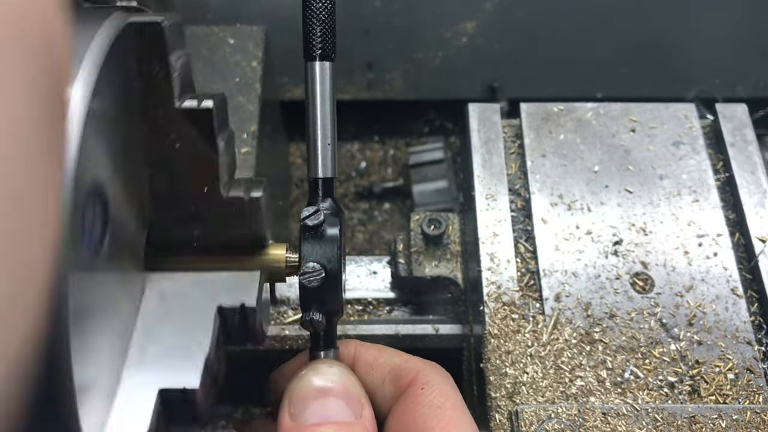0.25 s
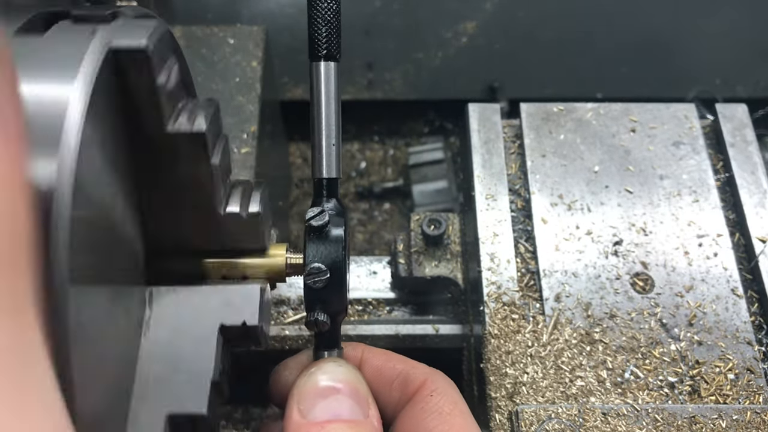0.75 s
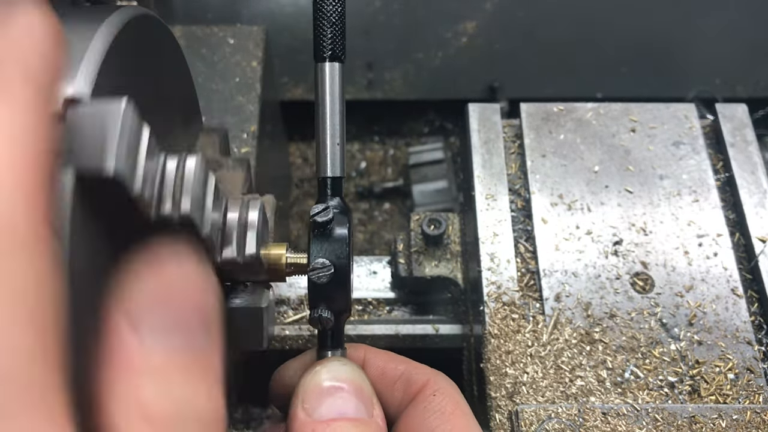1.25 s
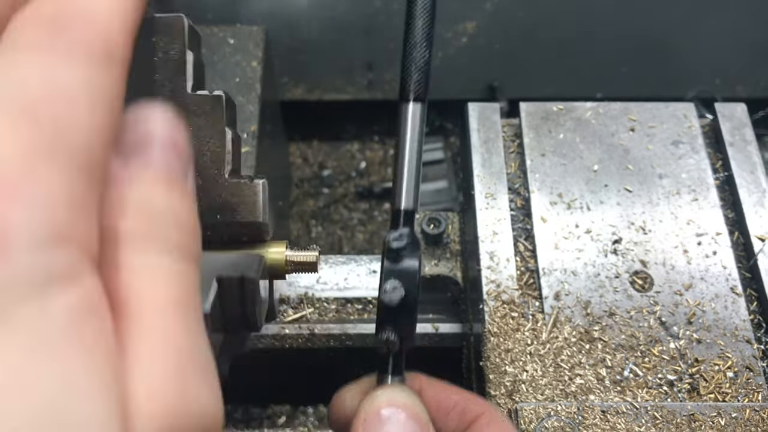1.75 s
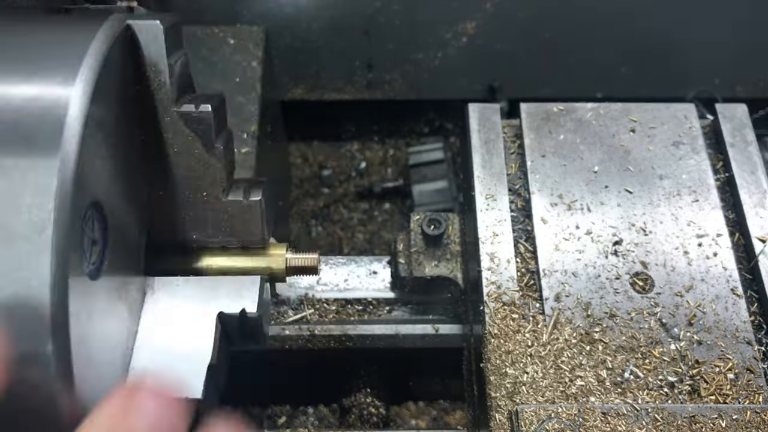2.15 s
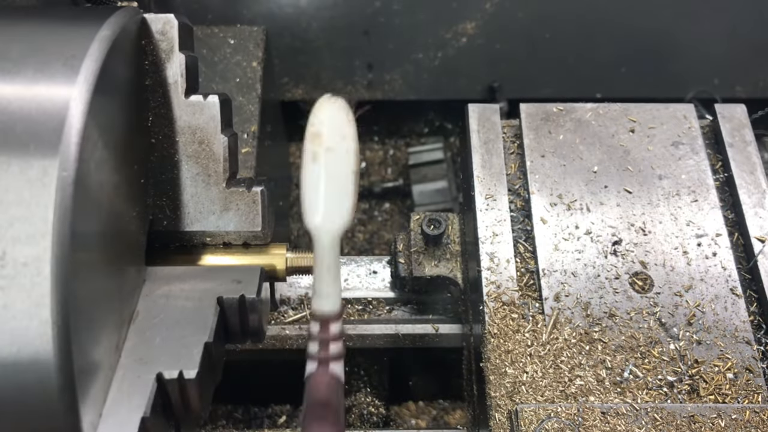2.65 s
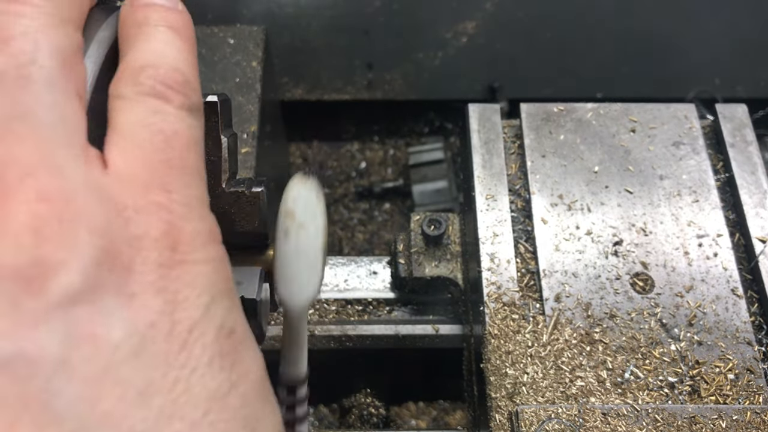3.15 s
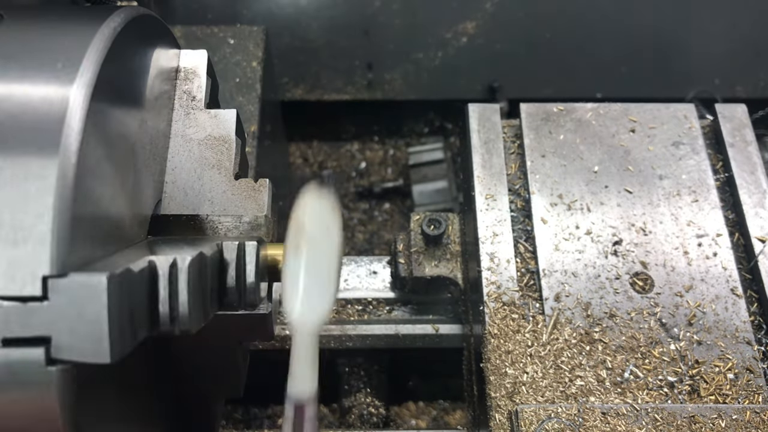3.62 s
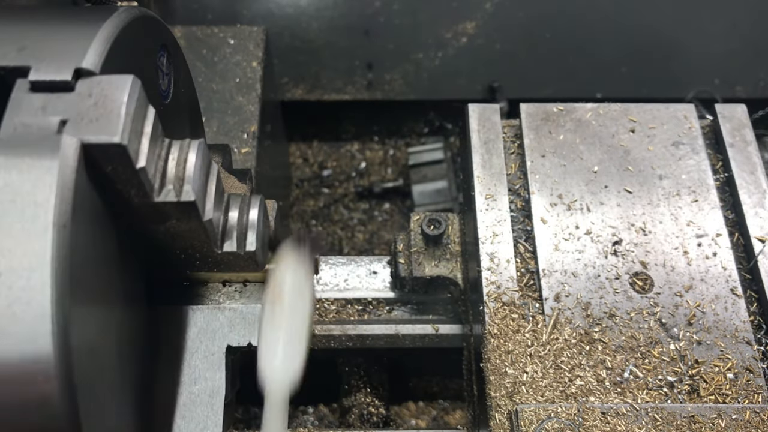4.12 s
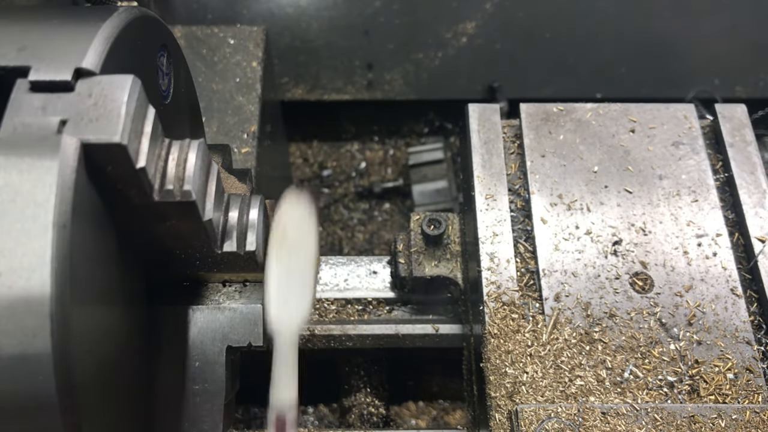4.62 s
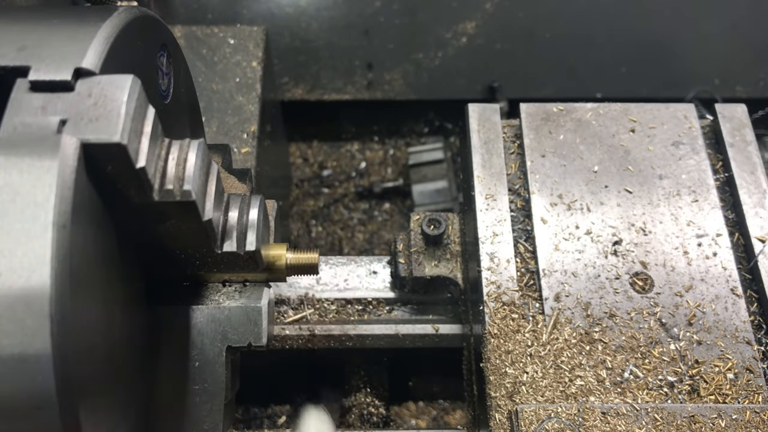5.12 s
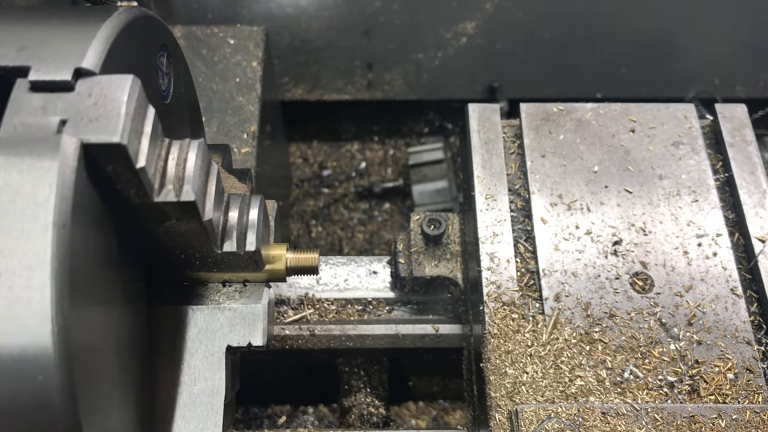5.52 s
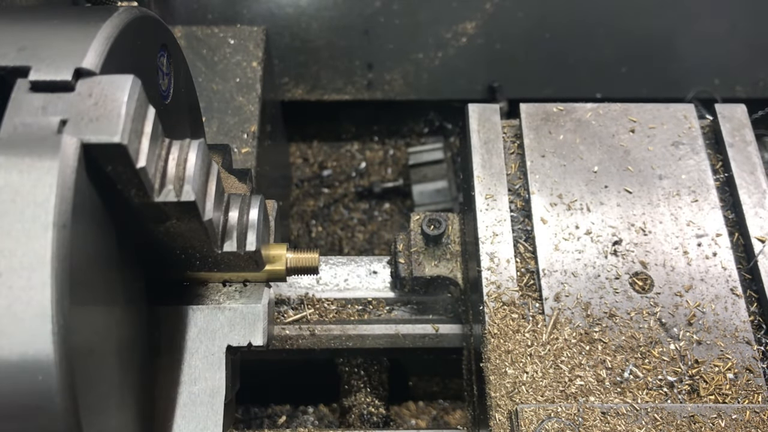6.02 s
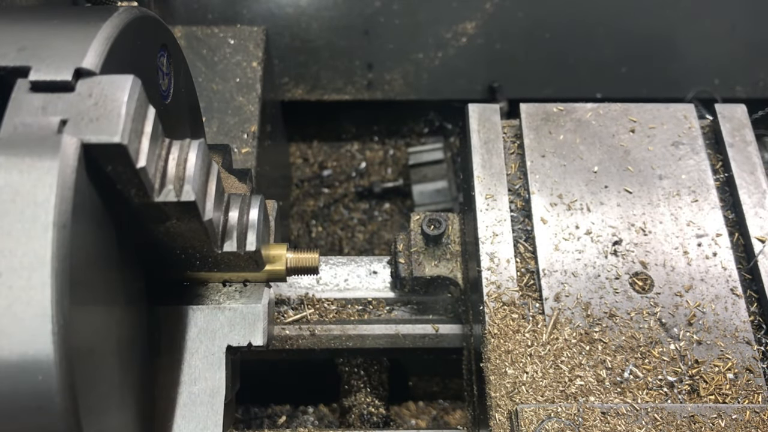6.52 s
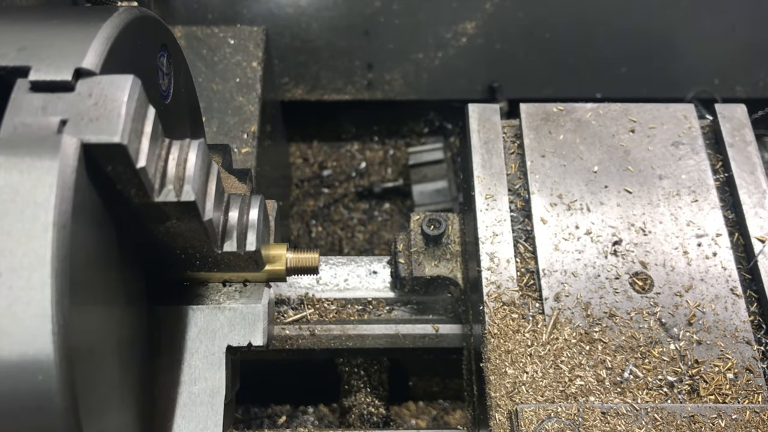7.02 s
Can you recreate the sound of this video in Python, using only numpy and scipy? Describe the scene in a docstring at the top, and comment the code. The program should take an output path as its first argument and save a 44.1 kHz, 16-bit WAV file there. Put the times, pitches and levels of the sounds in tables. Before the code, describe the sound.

A hand-turned lathe chuck rumbles, rasps and clicks about four times a second, then a brush taps sharply and steel scrapes and clanks over a soft fan hum.

```python
"""A lathe chuck is spun by hand to wind a threading die off a brass part, close to one microphone. Filtered noise
gives its rumble, rasp and hiss; decaying sines knock; short noise bursts tick and thud while the die is wound off.
Then a toothbrush taps and swishes over the fresh thread in clicks and grainy noise, and a steel tool is scraped
and set down close by, its modes ringing under the harder blows. The machine bed thuds softly in bursts of low noise.
In the background of the small workshop a fan hums throughout: air noise, resonances and a thin motor whine."""
import sys
import numpy as np
from scipy import signal
from scipy.fft import rfft, irfft, next_fast_len
from scipy.io import wavfile
from scipy.ndimage import uniform_filter1d

SR = 44100
rng = np.random.default_rng(int(sys.argv[2]) if len(sys.argv) > 2 else 0)


def dump(signal):
    """Clip the signal to [-1, 1] and save it as 16-bit WAV at the path in sys.argv[1]."""
    limited = np.clip(np.atleast_2d(signal).T, -1, 1)
    pcm = np.round(limited * 32767).astype(np.int16)
    wavfile.write(sys.argv[1], SR, pcm)


N = 320630  # length [samples]
T = np.arange(N) / SR  # time [s]

# In the tables "body" shelves the sound below 2.5-4.5 kHz and "top" shelves it above 8.5-11 kHz,
# both before the overall level is set.

# Fan air resonances: (centre [Hz], width at half amplitude [Hz], level before any wander or dip [dB])
FAN_RESONANCES = [(434.7, 155, -58.5), (1110, 6.7, -83), (1215, 13, -78), (1475, 21, -78),
                  (2050, 91, -74.5), (2227, 200, -72.5), (2950, 69, -75.5), (3083, 120, -74.5),
                  (3834, 89, -80.5)]
# Level curve of the background, with a brief dip; its end values hold outside it: (time [s], level [dB])
BACKGROUND_DIP = [(2.29, 2), (2.315, -4), (2.33, -18), (2.348, 3)]
# Spectrum of the fan's air: (frequency [Hz], relative level [dB])
AIR_TONE = [(25, -30.5), (45, -24.5), (70, -1), (170, -3.5), (225, -4.5), (310, 7), (480, 10), (660, -10.5),
            (900, -1), (1450, -5.5), (2300, -6.5), (2550, -10.5), (4500, -15.5), (10000, -22.5),
            (16000, -27)]

# Heavier bumps against the bed: (time [s], level [dB])
BUMPS = [(2.395, -62), (4.09, -62), (5.45, -64), (5.55, -62), (6.435, -60), (6.558, -58), (6.856, -56),
         (7.035, -55)]
# Spectrum of the spindle rumble and of the bed: (frequency [Hz], relative level [dB])
RUMBLE_TONE = [(25, -19), (48, -30.5), (68, -2), (112, 2.5), (160, 2.5), (200, -6), (260, -9), (450, -14.5),
               (800, -33)]

# Knocks and scrapes of the steel tool:
# (time [s], rise [s], hold [s], decay [s], level [dB], body [dB], top [dB], contact resonance [Hz])
SCRAPES = [(5.864, .0042, 0.0016, .015, -40, -6, -8, 900), (5.95, 0.00049, .0028, 0.013, -34, -4, 6, 2200),
           (5.983, 0.0012, 0.0089, 0.008, -38.5, 10, -13.5, 780),
           (6.071, 0.021, 0.012, 0.017, -39.5, -5.5, 1, 1800),
           (6.148, .014, .0057, .01, -55.5, -19, -2, 2400),
           (6.215, 0.015, .0043, 0.0088, -55.5, -12, -3, 2390),
           (6.437, 0.023, 0.0046, 0.012, -43, -9.5, -2.5, 1730),
           (6.542, 0.0044, 0.0035, 0.021, -39.5, 1.5, 1.5, 1500),
           (6.648, 0.0078, 0.017, .0034, -34, 2.5, 7.5, 640),
           (6.668, 0.0048, 0.025, 0.013, -34, -3.5, -2.5, 800),
           (6.823, 0.02, 0.002, .002, -37, -3, 1, 1220), (6.844, 0.0017, 0.016, .011, -32.5, 0.5, 4.5, 750),
           (6.891, .0037, 0.0036, 0.013, -35.5, -12, 2, 1170),
           (6.991, 0.017, 0.0085, .016, -40, 1, 2.5, 1600),
           (7.212, 0.0033, 0.016, 0.012, -43, -0.5, 0, 1590)]
# Blows that set the tool ringing: (time [s], level added to each mode [dB], place between the ends [0-1])
CLANKS = [(6.548, -9, 0.3), (6.676, 4.5, 0), (6.852, 6, 1), (6.896, 1.5, 1)]
# Modes of the tool: (frequency [Hz], t60 [s], level struck at one end [dB], level struck at the other [dB])
STEEL_MODES = [(708, .12, -44, -47), (795, .12, -35, -41), (872, .12, -40, -47), (1027, .3, -44, -50),
               (1120, .23, -52, -45), (1230, .28, -51, -48), (1290, .12, -48, -40), (1340, .12, -43, -47),
               (1749, .3, -43, -58), (2571, .1, -40, -56), (2815, .3, -58, -56), (2969, .48, -50, -45),
               (3116, .4, -44, -46), (3140, .5, -51, -45.5), (3166, .14, -40, -48), (3390, .09, -49, -39),
               (3677, .11, -43, -50), (3727, .1, -43, -46), (3844, .22, -51, -51), (4549, .16, -54, -55),
               (5690, .11, -48, -54), (5884, .25, -61, -64), (6568, .25, -61, -65), (6772, .35, -66, -70),
               (8080, .35, -59, -70), (8294, .14, -52, -55), (8650, .12, -52, -51), (9232, .2, -62, -55)]
# Spectrum of the sliding steel: (frequency [Hz], relative level [dB])
SCRAPE_TONE = [(150, -8.5), (400, -6.5), (800, 2), (1300, 0), (2100, -1.5), (3300, -0.5), (4700, -8.5),
               (5700, -6.5), (7000, -10.5), (8700, -7.5), (9800, -9), (11500, -9.5), (13500, -12.5),
               (15800, -17.5)]

# Brush strokes, the head touching the brass twice before or while the bristles drag: (time of tap [s], tap
# level [dB], body [dB], top [dB], time of the other touch from the tap, negative if before it [s], its level
# [dB], length of drag [s], drag level [dB], body of drag [dB])
STROKES = [(2.5893, -22.5, -0.5, -3, -0.013, -31, .028, -51.5, 7),
           (2.7142, -26.5, .5, -12, 0.068, -55, 0.077, -54, 3),
           (2.8397, -36, 3, 0, 0.023, -41, 0.047, -52.5, 0),
           (3.0007, -37, 4, 0.5, -0.003, -55, .08, -64, -7),
           (3.3559, -48, 0, -6.5, 0.017, -57, 0.056, -53, -4),
           (3.5391, -27, 2.5, -0.5, -.011, -39, 0.04, -54, -1.5),
           (3.6941, -30, -6, 6, -.0021, -42, 0.034, -50, 0),
           (3.8537, -32.5, -2.5, 5, -0.0034, -47, .038, -53.5, -2),
           (4.1433, -41.5, 7, 2, .0262, -41, .024, -45.5, 5),
           (4.6472, -31, -4.5, -0.5, -0.0076, -31.5, 0.028, -48, 0),
           (4.7989, -30, 3.5, -4.5, -.0085, -46.5, 0.034, -47, -4),
           (4.9447, -24.5, 4, 4, .0062, -31, 0.041, -51, -3),
           (5.1067, -46.5, 9, -4, 0.034, -51, 0.03, -43.5, -2)]
# Light passes of the bristles alone: (time [s], length [s], level [dB], body [dB], top [dB])
SWISHES = [(2.527, 0.016, -50.5, 1, 0), (2.9, 0.085, -64, -2, 2.5), (3.19, 0.071, -59, -8, 1.5),
           (4.037, 0.042, -65.5, -4, -14), (5.426, 0.062, -56, 4.5, 3.5), (5.78, 0.059, -55.5, 5, 0.5)]
# Spectra of the head's tap and of the bristles: (frequency [Hz], relative level [dB])
TAP_TONE = [(150, -29), (500, -3.5), (1000, -12), (1500, -4), (1950, -10), (2500, -5.5), (4000, -7.5),
            (5500, -2), (6300, -4), (7300, 0), (9800, -4.5), (11000, 2), (13500, -3.5), (15800, -7)]
BRISTLE_TONE = [(300, -6.5), (1000, -7.5), (2000, -6.5), (3000, -7.5), (4500, -6), (6000, -10.5),
                (8500, -8), (10000, -13), (12500, -12.5), (15800, -18)]

# Drive cycles, about four a second; the die binds a little after each knock:
# (time of knock [s], hiss level [dB], click level before the tick gain [dB], top of click [dB],
#  level of the lower knock tone [dB], knock to bind [s], rasp level [dB])
CYCLES = [(-.07, -58, -46, 0, -45, 0.098, -51.5), (0.1502, -55.5, -43.5, 1, -44, 0.079, -54),
          (0.3851, -54, -40, 6, -42, 0.092, -55.5), (0.6193, -58, -45.5, 1, -42.5, 0.1, -52.5),
          (.8668, -64, -43, 8, -44, 0.11, -57), (1.111, -61, -43, 6, -44.5, 0.1, -50.5),
          (1.3482, -58, -45.5, 1, -42, .085, -52), (1.5723, -54, -40.5, 2, -42.5, .078, -52.5),
          (1.7838, -55.5, -45.5, 4, -50, 0.076, -60.5)]
# Surges of the spindle in each cycle: (time after the knock [s], width [s], level [dB])
SURGES = [(.088, 0.027, -55.5), (.17, 0.068, -60.5)]
# Single ticks and snaps at the chuck, loud and faint:
# (time [s], level before the tick gain [dB], body [dB], top [dB])
SINGLE_TICKS = [(0.0333, -42, 1, -12), (0.056, -47.5, 4, -12), (0.2913, -45, 9.5, -3),
                (0.4493, -42.5, 10, 1), (0.5535, -45, 6, -8), (0.6955, -44, 13, -3),
                (0.7634, -40.5, 4, -27), (0.8912, -44.5, 9, 12), (1.023, -43, 2, -27),
                (1.0616, -45, 9.5, 12), (1.2169, -44, 1, -10), (1.326, -45, 20, -3), (1.4481, -45, 8, 12),
                (1.4772, -42, 9, -8), (1.551, -46.5, 12, 13), (1.614, -41.5, 11, 11),
                (1.7585, -66, -12, 17), (1.8429, -51.5, 2, 14), (1.8909, -46.5, 6.5, -1),
                (2.1002, -55, -6, 11)]
# A low thud late in the turning: (time [s], level [dB], body [dB], top [dB])
LATE_THUD = [(1.76, -44.5, 0, 0)]
# Spectra of the chuck's ticks, rasp, hiss and late thud: (frequency [Hz], relative level [dB])
TICK_TONE = [(200, -6.5), (500, -2), (900, -3.5), (1400, -3.5), (2200, -4.5), (3200, -1.5), (4500, -2.5),
             (7000, -3), (8500, -6), (10500, -17), (15800, -24)]
RASP_TONE = [(250, -11), (480, 10), (760, 1.5), (1000, -6.5), (1190, 5), (1550, 0), (1900, -5.5),
             (2300, -6), (4000, -5), (5200, -12.5), (8200, -17), (9800, -38)]
HISS_TONE = [(3000, -11.5), (6000, -8), (8400, 11.5), (9800, 1), (11000, 6.5), (16000, -2)]
LATE_THUD_TONE = [(60, -1), (150, 5), (330, -1), (520, 2), (900, -24), (4000, -49)]

BIND_WIDTH_S = 0.042  # each bind is a short swell


def undb(db):
    """Decibels to amplitude."""
    return 10 ** (np.asarray(db) / 20)


def unit(x):
    """Scale to rms 1."""
    return x / np.sqrt(np.mean(x ** 2))


def add(out, x, s):
    """Mix x into out from time s."""
    i = int(s * SR)
    x, i = x[max(-i, 0):], max(i, 0)
    out[i:i + len(x)] += x[:max(N - i, 0)]


def walk(rate):
    """Smooth random wander with a spread near 1."""
    k = max(int(SR / rate), 1)
    steps = np.repeat(rng.standard_normal(N // k + 1), k)
    return 1.2 * uniform_filter1d(steps, k)[:N]


def swell(s, width_s):
    """A smooth rise and fall around time s."""
    out = np.zeros(N)
    near = slice(*np.searchsorted(T, [s - 3 * width_s, s + 3 * width_s]))
    out[near] = np.exp(-((T[near] - s) / width_s) ** 2)
    return out


def fade(s, decay_s):
    """Full strength until time s, then dying away."""
    return np.exp(-np.maximum(T - s, 0) / decay_s)


def grit(n, scatter_db, size=12):
    """Noise broken into tiny grains of unequal strength."""
    strengths = undb(scatter_db * rng.standard_normal(n // size + 1))
    grains = np.repeat(strengths, size)[:n]
    return unit(grains * rng.standard_normal(n))


def colour(x, tone, body_db=0, top_db=0, peak_hz=1000, peak_db=0, peak_width=0.3, size=4096):
    """Causal filter of unit power through (Hz, dB) points, with shelves for body and top and one broad peak."""
    f = np.log(np.maximum(np.fft.rfftfreq(size, 1 / SR), 1))
    hz, db = np.transpose(tone)
    shelves = np.interp(f, np.log([2500, 4500, 8500, 11000]), [body_db, 0, 0, top_db])
    peak = peak_db * np.exp(-((f - np.log(peak_hz)) / peak_width) ** 2)
    gain = undb(np.interp(f, np.log(hz), db) + shelves + peak)
    # folding the cepstrum makes the filter minimum-phase, so nothing sounds ahead of its contact
    cepstrum = irfft(np.log(gain))
    cepstrum[1:size // 2] *= 2
    cepstrum[size // 2 + 1:] = 0
    response = irfft(np.exp(rfft(cepstrum)))
    return signal.fftconvolve(x, response / np.linalg.norm(response))[:len(x)]


def resonance(hz, width_hz):
    """Noise in one steep-sided resonance, rms 1."""
    n = next_fast_len(N, True)
    f = np.fft.rfftfreq(n, 1 / SR)
    gain = 1 / (1 + (2 * (f - hz) / width_hz) ** 2)
    return unit(irfft(rfft(rng.standard_normal(n)) * gain, n)[:N])


def ring(hz, t60, rise_s):
    """One mode that builds up during the contact and then fades."""
    t = T[:SR // 2]
    envelope = np.minimum(t / rise_s, 1) * np.exp(-np.log(1000) * t / t60)
    return envelope * np.sin(2 * np.pi * (hz * t + rng.random()))


def clicks(rows, tone, crack_s, ring_s, ring_db, tail_s, tail_db, vary_db=0, rise_s=0.00026, size=6000):
    """A hard contact: a crack, a short ring of the parts, then scatter from the machine around them."""
    out, t = np.zeros(N), T[:size]
    crack = np.exp(-t / crack_s)
    parts = undb(ring_db) * np.exp(-t / ring_s)
    scatter = undb(tail_db) * np.exp(-t / tail_s)
    envelope = (crack + parts + scatter) * np.minimum(t / rise_s, 1)
    hz, tone_db = np.transpose(tone)
    for s, db, body_db, top_db in rows:
        # where vary_db is set, each hit lands on another spot and favours other resonances
        spot = np.column_stack([hz, tone_db + vary_db * rng.standard_normal(len(hz))])
        hit = colour(envelope * rng.choice([-1, 1], size), spot, body_db, top_db)
        add(out, undb(db) * hit / np.std(hit[:SR // 100]), s)  # level over the first 10 ms
    return out


def rubs(rise, hold, decay, scatter_db, size=16000):
    """A sliding contact: a shower of micro-slips that swells, holds and dies away."""
    t = T[:size]
    envelope = np.minimum(t / rise, 1) * np.exp(-np.maximum(t - rise - hold, 0) / decay)
    return envelope * grit(size, scatter_db)


def sweeps(centre_hz, width_hz, climb_hz_per_s, length_s):
    """A swell of noise whose centre glides as the contact slides round, peaking 2 lengths after its start."""
    t = T[:int(4 * length_s * SR)] - 2 * length_s
    chirp = np.exp(2j * np.pi * (centre_hz * t + climb_hz_per_s * t ** 2 / 2))
    lowpass = signal.butter(2, width_hz / 2, fs=SR, output="sos")
    noise = grit(N // 10, 0.91) + 1j * grit(N // 10, 1)
    band = signal.sosfilt(lowpass, noise)[:len(t)]
    return unit((band * chirp).real) * np.exp(-(t / length_s) ** 2)


def workshop():
    """A fan in the background: broad air noise with a few fixed resonances, and the thin whine of its motor."""
    air = undb(-60.5) * colour(rng.standard_normal(N), AIR_TONE) * undb(0.5 * walk(5.6))
    hum = sum(undb(db + 0.25 * walk(5.3)) * resonance(hz, width) for hz, width, db in FAN_RESONANCES)
    # the whine wanders in pitch around 1085.5 Hz and in level around -72 dB
    whine_level = undb(-72 + 1.9 * walk(9.6))
    whine_hz = 1085.5 + 2.4 * walk(12)
    whine = whine_level * unit(np.sin(2 * np.pi * np.cumsum(whine_hz) / SR))
    return (air + hum + whine) * undb(np.interp(T, *np.transpose(BACKGROUND_DIP)))


def room(x, t60_s, wet_db):
    """A short diffuse echo from the workshop walls, starting 6 ms after the direct sound."""
    t = T[:SR // 2]
    tail = rng.standard_normal(len(t)) * np.exp(-np.log(1000) * t / t60_s) * (t > 0.006)
    tail = colour(tail, [(300, -2.0), (3000, -5.5), (14000, -19.0)])
    return x + undb(wet_db) * signal.fftconvolve(x, tail / np.linalg.norm(tail))[:N]


def bed():
    """Soft low thuds of the machine under the brush, the tool and the hands, over a faint steady stir."""
    lag_s, width_s = 0.015, 0.028
    # each thud stands a fixed distance below its tap or scrape
    thuds = [(s + lag_s, db - 35.5) for s, db, *_ in STROKES]
    thuds += [(s + rise + lag_s, db - 24) for s, rise, _, _, db, *_ in SCRAPES]
    push = undb(-75.5) + sum(undb(db) * swell(s, width_s) for s, db in thuds + list(BUMPS))
    return push * colour(rng.standard_normal(N), RUMBLE_TONE)


def steel_body(slips, low_hz, high_hz, t60_s, count=80):
    """The crowd of weak upper modes of the steel, rung by the slips."""
    pitches = low_hz * (high_hz / low_hz) ** rng.random(count)
    modes = sum(rng.rayleigh() * ring(hz, t60_s, rise_s=0.001) for hz in pitches)
    return signal.fftconvolve(slips, modes / np.linalg.norm(modes))[:N]


def tool():
    """Steel slides on steel; the harder blows set its modes ringing until it is laid against the bed."""
    contact, ringing, force = np.zeros(N), np.zeros(N), np.zeros(N)
    for s, rise, hold, decay, db, body_db, top_db, hz in SCRAPES:
        slips = rubs(rise, hold, decay, scatter_db=1.0)
        scrape = colour(slips, SCRAPE_TONE, body_db, top_db, peak_hz=hz, peak_db=10)
        add(contact, undb(db) * scrape, s)
    for s, db, place in CLANKS:
        # the place of the blow decides which modes speak
        clank = sum(undb(db + near_db + place * (far_db - near_db)) * ring(hz, t60, rise_s=0.002)
                    for hz, t60, near_db, far_db in STEEL_MODES)
        add(ringing, clank, s)
        force = np.maximum(force, undb(db) * swell(s, width_s=0.026))
    # light scrapes stay dry; only those under a blow reach the upper modes
    upper = undb(-8.5) * steel_body(contact * force, low_hz=3800, high_hz=13000, t60_s=0.15)
    laid_down = fade(6.995, decay_s=0.022)
    return contact + (ringing + upper) * laid_down


def brush():
    """Taps of the head are hard contacts; the bristles flick across the thread in grainy noise."""
    out, taps = np.zeros(N), []
    rise_s, decay_s, lag_s = 0.015, 0.0032, 0.014  # drag of a stroke, the lag counted from its tap
    for s, db, body_db, top_db, touch_s, touch_db, drag_s, drag_db, drag_body_db in STROKES:
        taps += [(s, db, body_db, top_db), (s + touch_s, touch_db, body_db, top_db)]
        flicks = rubs(rise_s, drag_s - rise_s, decay_s, scatter_db=4.5)
        drag = colour(flicks, BRISTLE_TONE, drag_body_db, top_db=1.5)
        add(out, undb(drag_db) * drag, s + lag_s)
    rise_s, decay_s = 0.018, 0.024  # light passes
    for s, length_s, db, body_db, top_db in SWISHES:
        flicks = rubs(rise_s, length_s - rise_s, decay_s, scatter_db=4.5)
        add(out, undb(db) * colour(flicks, BRISTLE_TONE, body_db, top_db), s)
    return out + clicks(taps, TAP_TONE, crack_s=0.0003, ring_s=0.0028, ring_db=-15,
                        tail_s=0.012, tail_db=-27.5, rise_s=0.00015)


def drive():
    """Once a cycle: a rising hiss, a hollow two-tone knock, a falling rasp."""
    out = np.zeros(N)
    for s, hiss_db, _, _, knock_db, lag, rasp_db in CYCLES:
        # the pitch of the knock spreads by 2.3 % from cycle to cycle
        low_hz, high_hz = np.array([1206, 1580]) * (1 + 0.023 * rng.standard_normal(2))
        low_tone = ring(low_hz, t60=0.057, rise_s=0.0023)
        high_tone = ring(high_hz, t60=0.047, rise_s=0.009)
        rising = sweeps(centre_hz=10870, width_hz=17000, climb_hz_per_s=140000, length_s=0.018)
        falling = sweeps(centre_hz=3123, width_hz=2600, climb_hz_per_s=-28000, length_s=0.036)
        add(out, undb(hiss_db) * rising, s - 0.072)
        add(out, undb(knock_db) * (low_tone + undb(4.0) * high_tone), s + 0.00293)
        add(out, undb(rasp_db - 2) * falling, s + lag - 0.07)
    return out


def crackle(per_s, grain_s):
    """Brass chips snapping in the thread: sparse, short grains of unequal size."""
    snaps = (rng.random(N) < per_s / SR) * rng.uniform(0.73, 1, N)
    grains = signal.lfilter([1], [1, -np.exp(-1 / (grain_s * SR))], snaps)
    return unit(grains * rng.standard_normal(N))


def chips(count=2):
    """A few small snaps scattered over each bind, set from the level of its rasp, as rows for clicks()."""
    return [(s + lag + BIND_WIDTH_S * when, rasp_db - 3.5 - strength, 0, 0)
            for s, *_, lag, rasp_db in CYCLES for when, strength in rng.uniform(-1, 1, (count, 2))]


def chuck():
    """The spindle rumbles while the die rasps along the thread and ticks, with a low thud late in the turning."""
    stop_s = 2
    surges = sum(undb(db) * swell(s + lag, width) for s, *_ in CYCLES for lag, width, db in SURGES)
    bind = sum(undb(rasp_db) * swell(s + lag, BIND_WIDTH_S) for s, *_, lag, rasp_db in CYCLES)
    rumble = (undb(-63) + surges) * fade(stop_s, decay_s=0.03)
    # between the binds the die slides lightly; the rasp ends first, then the chuck stops
    rasp = (undb(-62) + bind) * fade(1.89, decay_s=0.015)
    hiss = undb(-71) * fade(stop_s, decay_s=0.17) + undb(-19.5) * bind

    rolling = colour(rng.standard_normal(N), RUMBLE_TONE)
    low = unit(rolling + undb(-1.0) * resonance(109, 5.8) + undb(-8.0) * resonance(165, 6.9))
    snapping = crackle(per_s=170, grain_s=0.0008)
    rasping = colour(undb(-3.5) * grit(N, 3) + undb(-2) * snapping, RASP_TONE)
    hissing = colour(grit(N, 2.4), HISS_TONE)

    play = [(s, click_db, -1.5, top_db) for s, _, click_db, top_db, *_ in CYCLES]
    ticks = clicks(play + list(SINGLE_TICKS) + chips(), TICK_TONE, crack_s=0.00031, ring_s=0.0092, ring_db=-6,
                   tail_s=0.0084, tail_db=-20, vary_db=1.5)
    tick_gain = undb(-4.0)
    thud = clicks(LATE_THUD, LATE_THUD_TONE, crack_s=0.0035, ring_s=0.008, ring_db=-4, tail_s=0.022, tail_db=-8)
    return rumble * low + rasp * rasping + hiss * hissing + tick_gain * ticks + thud


def scene():
    """All sources, close to one microphone; the walls answer the handwork, and the fan is added without echo."""
    handwork = chuck() + drive() + brush() + tool() + bed()
    return (room(handwork, t60_s=0.2, wet_db=-26.0) + workshop())[None]


def record(dry):
    """The recorder cuts the deep bass below 55 Hz and the top above 15.9 kHz."""
    highpass = signal.butter(4, 55, "high", fs=SR, output="sos")
    lowpass = signal.ellip(8, 0.2, 70, 15900, fs=SR, output="sos")
    return signal.sosfilt(lowpass, signal.sosfilt(highpass, dry))


dry = scene()
out = record(dry)
dump(out)
```